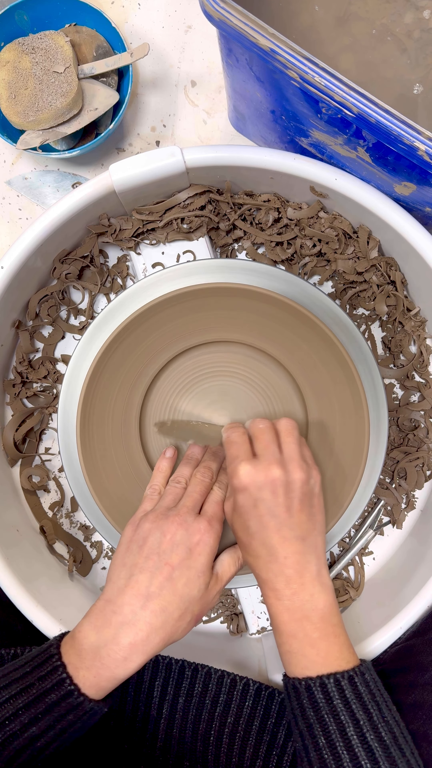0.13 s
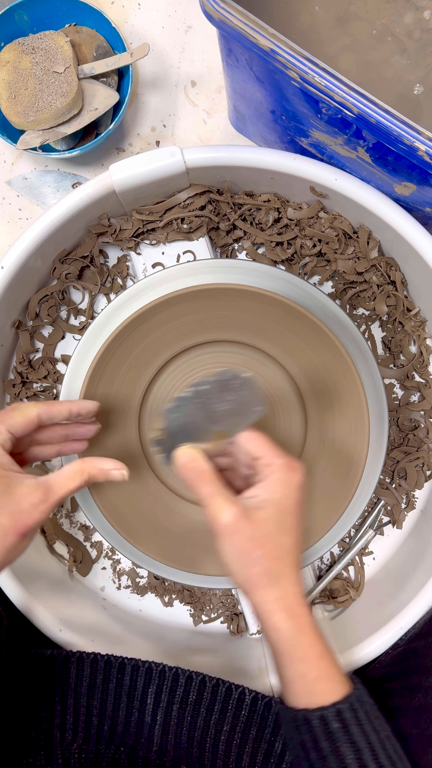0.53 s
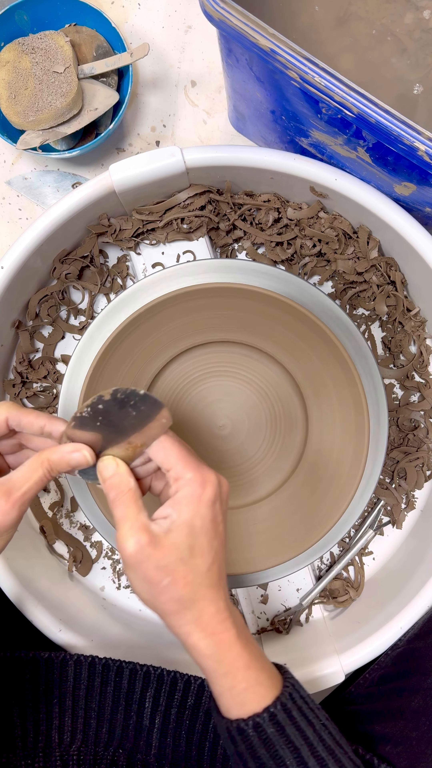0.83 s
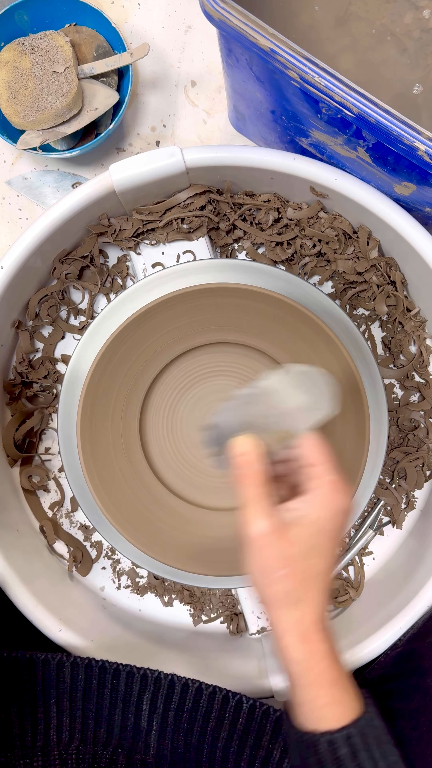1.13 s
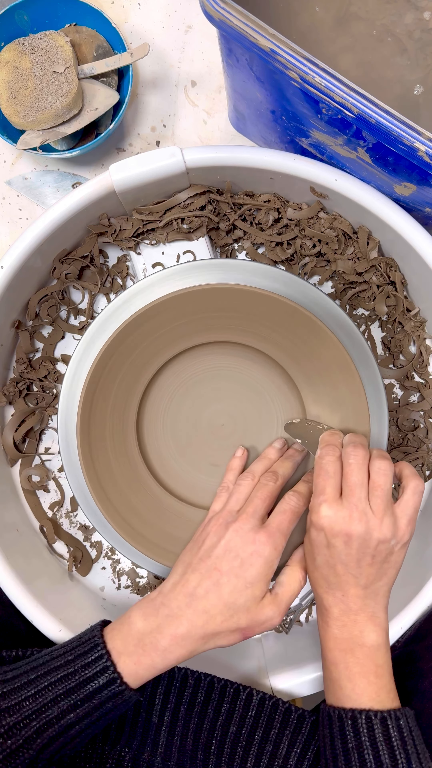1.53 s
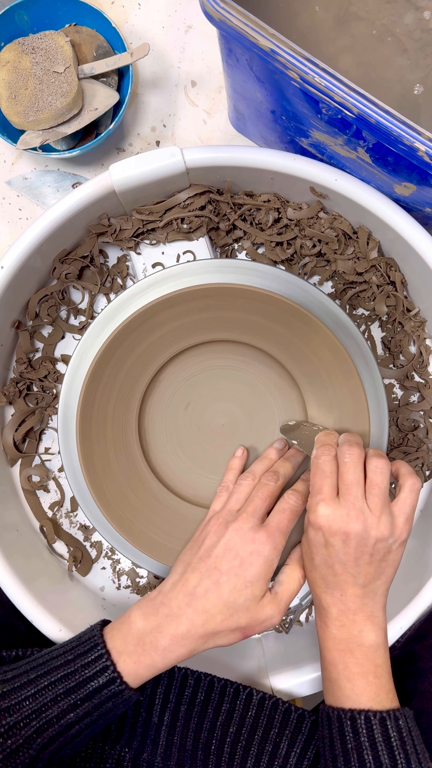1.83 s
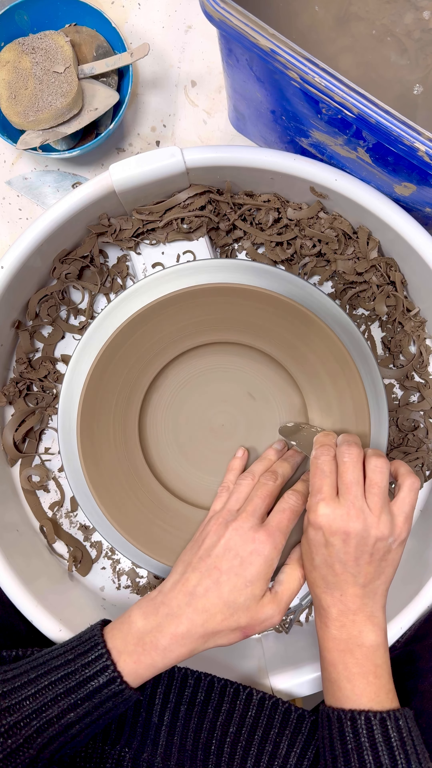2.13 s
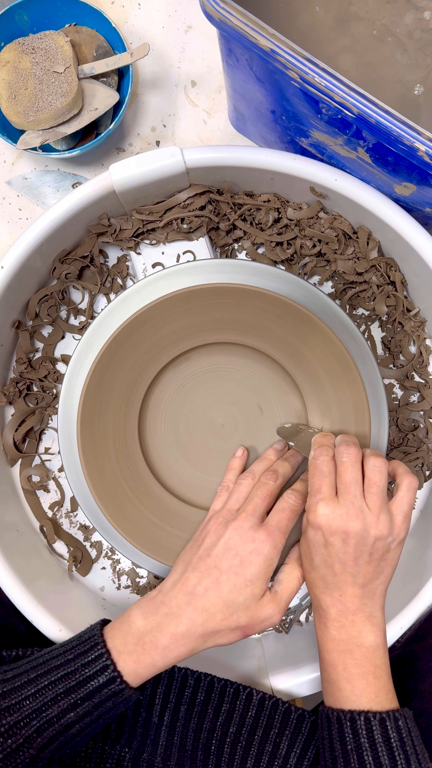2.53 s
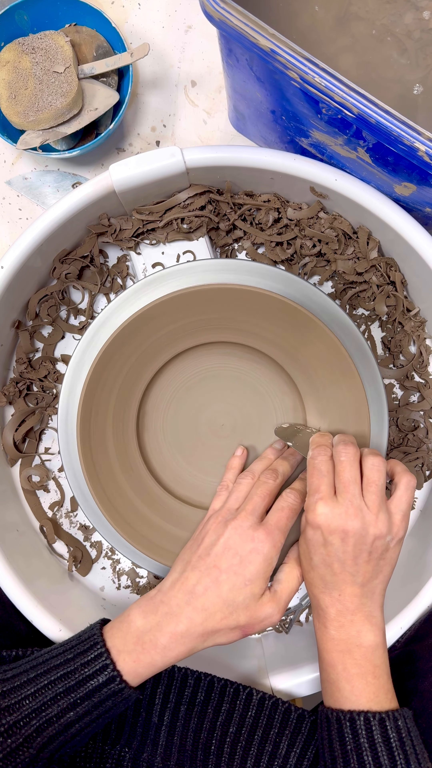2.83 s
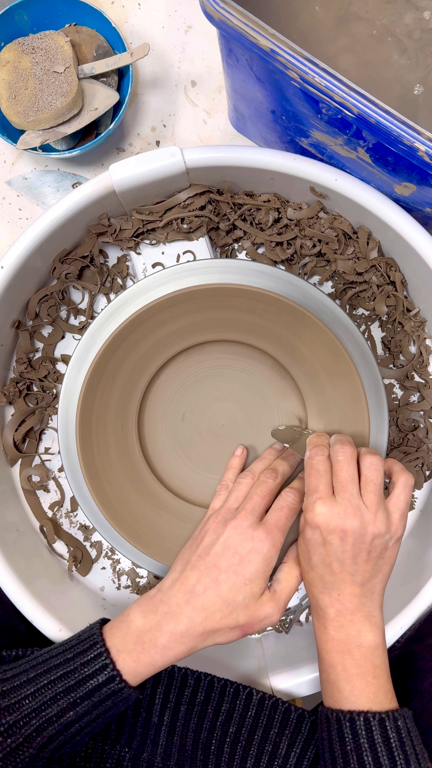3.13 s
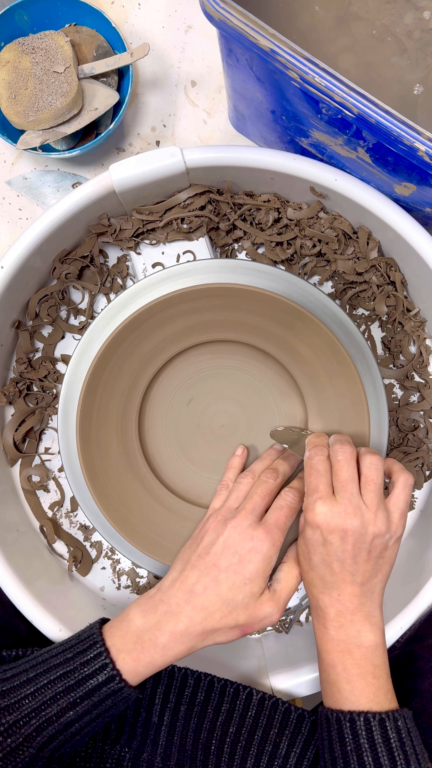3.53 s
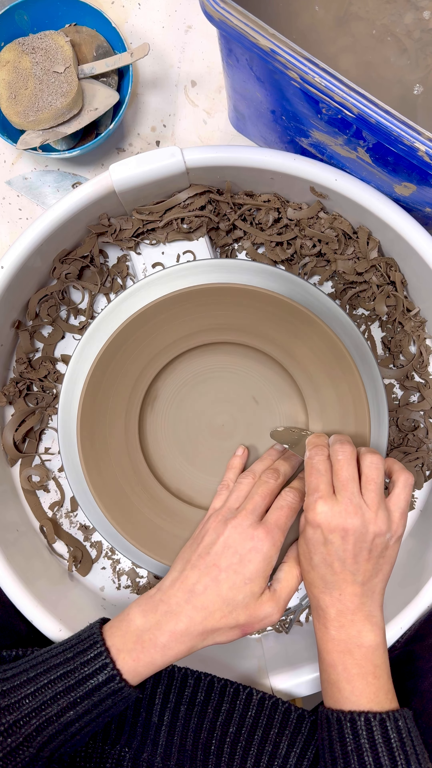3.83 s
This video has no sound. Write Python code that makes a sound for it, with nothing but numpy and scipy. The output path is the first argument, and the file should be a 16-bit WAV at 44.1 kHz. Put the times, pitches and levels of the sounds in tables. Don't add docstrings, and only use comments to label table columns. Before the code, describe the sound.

Gritty metal scraping on spinning clay, preceded by a free-running pottery wheel's singing motor, low airy puffs and one tiny metallic tick; an abrupt cut brings the rasping strokes over a lower hum. Close stereo microphone, indoor workshop.

```python
import sys
import numpy as np
from scipy import signal
from scipy.fft import rfft, irfft
from scipy.io import wavfile
from scipy.ndimage import uniform_filter1d

SR = 44100
rng = np.random.default_rng(int(sys.argv[2]) if len(sys.argv) > 2 else 0)


def nominal_scale(level):
    x = np.asarray(level, float) / 20
    return 10 ** x


def transcribe(u):
    v = np.clip(np.atleast_2d(u).T, -1, 1)
    q = np.round(v * 32767).astype(np.int16)
    wavfile.write(sys.argv[1], SR, q)


N = 175959

# [t/s, gear tone f/Hz, level/dB, octave level/dB]
FREE_MOTOR = [
    (0, 444, -28, -52),
    (.5, 443.5, -28.5, -53),
    (1.34, 445.2, -28, -46.5),
]
# [t/s, gear tone f/Hz, level/dB, octave level/dB]
LOADED_MOTOR = [
    (1.33, 368.8, -38.5, -53.5),
    (2.1, 366, -38, -58),
    (2.6, 367.3, -37.5, -56),
    (3.1, 365.8, -38.5, -58),
    (4, 362.7, -38, -61),
]
# [f/Hz, level/dB per Hz]
FREE_WASH = [(60, -5.5), (300, -10), (760, -5), (1300, -16.5), (3300, -29), (7600, -16), (10500, -13),
             (15500, -24)]
# [f/Hz, level/dB per Hz]
LOADED_WASH = [(25, -11.5), (80, -14.5), (150, -2), (330, -3), (490, -2), (1000, -10)]
# [f/Hz, width/Hz, level/dB]
WHINES = [(2235, 20, -3.5), (2540, 270, -10.5), (5076, 25, -2.5), (6500, 27, -19), (6310, 35, 1.5),
          (7200, 71, 2.5), (7650, 50, 1), (7960, 130, 2.5), (7660, 49, -5.5), (15400, 300, -9)]
# [t/s, level/dB]
STIR_LEVEL = [
    (0, -68),
    (.06, -51.5),
    (.1, -41.5),
    (.45, -42.5),
    (.72, -40),
    (.8, -50),
    (.95, -56.5),
    (1.2, -52.5),
    (1.33, -56),
]
# [f/Hz, level/dB]
STIR_COLOUR = [(25, -46), (50, -6), (100, -3.5), (240, -7.5), (370, -16.5), (600, -41)]
# [f/Hz, width/Hz, level/dB]
STIR_BOOMS = [(54.7, 5.4, -4.5), (87.3, 5.4, 9), (107, 6.3, -7), (151, 17, 5), (193.5, 6.7, -3),
              (227, 12, -3), (338, 54, -4)]
# [t/s, length/s, rib level/dB, dish level/dB, fizz level/dB]
HIGH_SPOTS = [(1.317, 0.068, 4.5, 5.5, 3), (1.462, 0.1, 4, 7.5, 5.5), (1.567, 0.22, 7.5, 9, 11.5),
              (1.88, 0.12, 3.5, 9, 5), (1.998, 0.18, 6, 7.5, 9), (2.179, 0.05, 6, 7, 1.5),
              (2.311, 0.15, 3, 8.5, 5), (2.456, 0.12, 3, 5.5, 2.5), (2.537, 0.065, 6, 2, 7.5),
              (2.736, 0.11, 2, 6.5, 6.5), (2.854, 0.088, 5.5, 11, 9.5), (2.959, 0.059, 9, 10, 3),
              (3.114, 0.1, 6.5, 9, 8), (3.228, 0.15, 7.5, 11, 8.5), (3.39, 0.088, 5.5, 3.5, 3),
              (3.534, 0.079, 2.5, 5, 5), (3.604, 0.11, 5.5, 10.5, 6.5), (3.714, 0.12, 6.5, 10, 6.5),
              (3.894, 0.085, 3.5, 5, 5)]
# [f/Hz, width/Hz, level/dB]
DISH_TONES = [(1132, 61, -12), (1214, 61, -5), (1418, 87, -4), (1480, 96, -0.5), (1810, 170, -13),
              (2038, 48, -4), (2142, 29, -6.5)]
# [f/Hz, width/Hz, level/dB]
RIB_TONES = [(2460, 210, -10), (2708, 82, 5), (2769, 96, 4), (2833, 46, 7.5), (2940, 100, 1.5),
             (3102, 54, 5), (3324, 63, 0.5), (3895, 260, -6)]
# [f/Hz, level/dB per Hz]
FIZZ_COLOUR = [(60, -61), (300, -14), (500, -12), (950, -15), (2300, -21), (4500, -13.5), (8300, -28),
               (15500, -15.5)]
# [f/Hz, width/Hz, level/dB]
FIZZ_TONES = [(5100, 260, -20.5), (5750, 133, -10), (6030, 67, -13.5), (6650, 293, -9.5),
              (7730, 470, -15.5), (10560, 1250, -12)]
# [t/s, peak level/dB]
RIB_CATCHES = [(1.4022, -29), (1.4285, -33), (1.4912, -31), (1.604, -28), (1.6282, -28), (1.6477, -26),
               (1.653, -23), (1.7057, -25), (1.7417, -38), (1.7834, -26), (1.835, -28), (1.9396, -27),
               (2.0107, -27), (2.0283, -29), (2.0288, -25), (2.0556, -17.5), (2.08, -33), (2.0932, -27.5),
               (2.117, -35), (2.1685, -30), (2.1969, -22.5), (2.2154, -32), (2.3416, -33), (2.4715, -29),
               (2.4822, -21), (2.5376, -34), (2.5445, -44), (2.5583, -35), (2.6195, -30), (2.7516, -28),
               (2.7796, -26.5), (2.9145, -31), (2.92, -20), (3.1256, -28), (3.3403, -29.5), (3.346, -29),
               (3.395, -27), (3.411, -23), (3.487, -38), (3.5987, -32.5), (3.7115, -31), (3.725, -34),
               (3.7401, -32), (3.7738, -20), (3.7751, -26), (3.8065, -33), (3.8407, -23), (3.9006, -28),
               (3.924, -28.5), (3.9707, -28)]
# [t/s, peak level/dB]
DISH_CATCHES = [(1.3668, -53), (1.6247, -30), (1.734, -51), (1.764, -43), (1.8978, -41), (1.9166, -32),
                (1.975, -42), (2.3295, -52), (2.3591, -35.5), (2.3876, -40), (2.448, -35), (2.488, -30.5),
                (2.5225, -30), (2.7302, -34.5), (2.752, -33), (2.7826, -36), (2.8065, -32.5), (2.8233, -28),
                (2.871, -34.5), (2.9103, -36.5), (2.965, -36), (3.2133, -40), (3.244, -38), (3.2644, -27),
                (3.319, -32), (3.3374, -25), (3.5982, -29.5), (3.6625, -36), (3.7675, -30), (3.924, -34)]
# [t/s, peak level/dB]
EDGE_CATCHES = [(1.4586, -30), (1.624, -29), (1.6946, -25.5), (1.902, -27), (2.004, -38), (2.157, -26),
                (2.5446, -37), (2.82, -30.5), (2.8649, -29), (2.89, -26.5), (2.9697, -30), (3.1243, -35),
                (3.1313, -29), (3.2963, -31), (3.347, -27), (3.5523, -38), (3.5803, -35), (3.5977, -27.5),
                (3.777, -39), (3.923, -29.5)]
# [t/s, peak level/dB]
SNAPS = [
    (1.345, -36),
    (1.706, -25.5),
    (2.4878, -14.5),
    (2.8914, -32),
    (2.9135, -28),
    (3.1714, -17),
    (3.3463, -32),
    (3.5977, -26),
    (3.8402, -32),
]
# [f/Hz, width/Hz, level/dB]
RIB_KNOCK = [(2950, 600, 0), (3900, 600, -8)]
# [f/Hz, width/Hz, level/dB]
DISH_KNOCK = [(1480, 200, 0), (1220, 150, -4), (2080, 300, -12)]
# [f/Hz, width/Hz, level/dB]
EDGE_KNOCK = [(5430, 440, 1.5), (6800, 410, 1), (4630, 600, -13)]
BUMP_TIMES = [1.68, 3.5, 1.91]
# [f/Hz, side minus mid level/dB]
PORT_GAP = [(100, -18), (460, -30.5), (650, -4.5), (1300, -12.5), (1900, -16), (2900, -8.5), (3950, -17.5),
            (5000, -3), (6500, -3.5), (9800, 5.5)]
SUDDEN_TIMES = [1.347, 2.488]

CUT_S, FADE_IN_S, FREE_LEFT_DB = 1.3365, 0.021, 1.8
WAVER_HZ, WAVER_DB = 0.89, .5
WHINE_DB, WASH_FREE_DB, WASH_LOADED_DB, AIR_DB = -52.5, -47.5, -52.5, -65
LAST_TOUCH_S, LAST_TOUCH_DB, TICK_S, TICK_DB = 0.13, -58.5, .956, -25.5
RIB_DB, DISH_DB, FIZZ_DB = -46, -54, -45.5
GRAINS_PER_S, GRAIN_SPREAD_DB, GRAIN_SHARE = 600, 5.5, 0.41
CHATTER_DB, SWAY_DB, TOP_SWAY_DB = 1.5, .6, 0.5
EDGE_S, RELEASE_S = .02, 0.038
SHEEN_S, SHEEN_DB, SHEEN_WIDTH_S = 2.84, 7, .08
GRIT_DB, RIB_T60, DISH_T60, EDGE_T60, SNAP_T60 = 0.5, 0.015, 0.028, 0.019, .008
RUB_DB, RUB_WIDTH_S = -51.5, 0.064
LOW_CUT_HZ, EDGE_HZ = 25, 15850
PORT_NULL_HZ, PORT_TOP_HZ, PORT_TOP_DB = 11960, 14160, 3.5
MASK_DB, MASK_FROM_HZ, MASK_JITTER_DB = -14, 1300, 3
QUIET_DB, WEAK_DB, LOOSE = -61.5, -8.5, .8


def evened(x):
    return x / np.sqrt(np.mean(x ** 2) + 1e-20)


def read(points, hz):
    f, value = np.transpose(points)
    return np.interp(np.log(hz + 1), np.log(f + 1), value)


def curve(table, col):
    return np.interp(np.arange(N) / SR, np.array(table)[:, 0], np.array(table)[:, col])


def hiss():
    return rng.standard_normal(N)


def coloured(x, points):
    return irfft(rfft(x) * nominal_scale(read(points, np.fft.rfftfreq(N, 1 / SR))), N)


def resonate(x, peaks):
    out = np.zeros(len(x))
    for k, (hz, width, db) in enumerate(peaks):
        ring = signal.lfilter(*signal.iirpeak(hz, hz / width, SR), x)
        out += (-1) ** k * nominal_scale(db) * ring
    return out


def slow(top_hz):
    t = np.arange(0, N + 64, 64) / SR
    f = np.geomspace(top_hz / 20, top_hz, num=30)[:, None]
    waves = np.sin(2 * np.pi * (f * t + rng.random((30, 1)))) / f ** 0.22
    return evened(np.interp(np.arange(N) / SR, t, waves.sum(0)))


def add(mix, s, sound):
    part = mix[round(s * SR):][:len(sound)]
    part += sound[:len(part)]


def hump(s, width_s):
    return np.exp(-((np.arange(N) / SR - s) / width_s) ** 2)


def motor(table):
    turn = 2 * np.pi * np.cumsum(curve(table, 1) + WAVER_HZ * slow(9.8)) / SR
    tone = nominal_scale(curve(table, 2) + WAVER_DB * slow(30)) * np.sin(turn)
    octave = nominal_scale(curve(table, 3) + 0.75 * slow(20)) * np.sin(2 * turn + 1.06)
    return np.sqrt(2) * (tone + octave)


def motor_whine():
    return nominal_scale(WHINE_DB) * evened(resonate(hiss(), WHINES))


def free_wash():
    return nominal_scale(WASH_FREE_DB + 1.3 * slow(60)) * evened(coloured(hiss(), FREE_WASH))


def stirred_air():
    air = coloured(hiss(), STIR_COLOUR)
    boom = resonate(air, STIR_BOOMS)
    return nominal_scale(curve(STIR_LEVEL, 1) + 0.98 * slow(25)) * evened(0.59 * air + boom)


def rasp():
    size_db = GRAIN_SPREAD_DB * np.minimum(rng.exponential(1, N), 4)
    grains = nominal_scale(size_db) * (rng.random(N) < GRAINS_PER_S / SR)
    grains *= rng.choice([-1., 1.], N)
    return GRAIN_SHARE * evened(grains) + hiss()


def last_touch():
    touching = np.arange(N) < LAST_TOUCH_S * SR
    return nominal_scale(LAST_TOUCH_DB) * touching * evened(resonate(rasp(), DISH_TONES + RIB_TONES[:3]))


def fingertip_tick():
    out, u = np.zeros(N), np.arange(600) / SR
    puff = nominal_scale(TICK_DB - 60 * u / 0.036) * np.minimum(u / 0.0022, 1) * rng.standard_normal(600)
    tones = [(2100, 500, -8), (2900, 500, -4), (3700, 300, -1),
             (4800, 250, 2), (5500, 250, 0), (6700, 400, -2)]
    add(out, TICK_S, resonate(puff, tones))
    return out


def free_wheel():
    return last_touch() + motor_whine() + free_wash() + stirred_air() + fingertip_tick()


def loaded_wash():
    wash = evened(coloured(hiss(), LOADED_WASH + [(2500, -70)]))
    wash = wash + resonate(hiss(), [(494.3, 14.0, 20), (695, 14, 21)])
    return nominal_scale(WASH_LOADED_DB + 2.4 * slow(26)) * wash


def loaded_air():
    return nominal_scale(AIR_DB) * evened(coloured(hiss(), FIZZ_COLOUR))


def pressure(col):
    t, out = np.arange(N) / SR, np.zeros(N)
    for row in HIGH_SPOTS:
        out += row[col] * ((t > row[0]) & (t <= row[0] + row[1]))
    keep = np.exp(-1 / (RELEASE_S * SR))
    out = np.maximum(out, signal.lfilter([1 - keep], [1, -keep], out))
    return uniform_filter1d(out, max(round(EDGE_S * SR), 1))


def ringing(force, chatter, level_db, col, tones):
    level = level_db + pressure(col) + chatter + SWAY_DB * slow(40)
    return nominal_scale(level) * evened(resonate(rasp() + force, tones))


def clay_fizz(force, chatter):
    shaved = coloured(force, FIZZ_COLOUR) + 1.75 * resonate(force, FIZZ_TONES)
    level = FIZZ_DB + pressure(col=4) + 0.61 * chatter + 0.094 * slow(40)
    fizz = nominal_scale(level) * evened(shaved)
    top = coloured(fizz, [(7000, -30), (9000, 0)])
    fizz = fizz + top * (nominal_scale(TOP_SWAY_DB * slow(15)) - 1)
    sheen = nominal_scale(SHEEN_DB * hump(SHEEN_S, SHEEN_WIDTH_S)) - 1
    return fizz + sheen * coloured(fizz, [(11500, -29), (13000, 3)])


def catches(table, t60, body):
    out, u = np.zeros(N), np.arange(1500) / SR
    fade = nominal_scale(-60 * u / t60) * np.minimum(u * 3000, 1)
    click = 2.3 * (abs(u - .0005) < 1e-4)
    for (s, db), noise in zip(table, rng.standard_normal((len(table), 1500))):
        ring = body(fade * (noise + click))
        add(out, s, nominal_scale(db + GRIT_DB) * ring / abs(ring).max())
    return out


def grit():
    snaps = catches(SNAPS, SNAP_T60, lambda x: np.diff(x, n=2, prepend=[0, 0]))
    rib = catches(RIB_CATCHES, RIB_T60, lambda x: resonate(x, RIB_KNOCK))
    dish = catches(DISH_CATCHES, DISH_T60, lambda x: resonate(x, DISH_KNOCK))
    edge = catches(EDGE_CATCHES, EDGE_T60, lambda x: resonate(x, EDGE_KNOCK))
    return snaps + rib + dish + edge


def scrape():
    chatter = CHATTER_DB * slow(330)
    force = rasp()
    rib = ringing(force, chatter, RIB_DB, 2, RIB_TONES)
    dish = ringing(force, chatter, DISH_DB, 3, DISH_TONES)
    fizz = clay_fizz(force, chatter)
    return coloured(rib + dish + fizz + grit(), [(40, -30), (300, 0)])


def bump_rub():
    bump = sum(hump(s, RUB_WIDTH_S) for s in BUMP_TIMES)
    return nominal_scale(RUB_DB) * bump * evened(resonate(hiss(), [(308, 37, 4), (480, 140, -3)]))


def loaded_wheel():
    return motor(LOADED_MOTOR) + loaded_wash() + loaded_air() + scrape() + bump_rub()


def scene():
    t = np.arange(N) / SR
    lean = nominal_scale([[FREE_LEFT_DB / 2], [-FREE_LEFT_DB / 2]])
    free = free_wheel() + motor(FREE_MOTOR) * lean
    fade_in = np.clip((t - CUT_S) / FADE_IN_S, 0, 1)
    return np.where(t < CUT_S, free, fade_in * loaded_wheel())


def masked(pair):
    hz, t, z = signal.stft(pair, SR, nperseg=2048, noverlap=1024)
    blur = LOOSE * (hz > 550)[:, None] * rng.standard_normal(z.shape[1:])
    z = z * np.exp(1j * blur * [[[0]], [[1]]])
    strength = abs(z) ** 2
    band = np.cumsum(1 / (6 + np.arange(1025) // 30)).astype(int)
    member = band[:, None] == np.arange(band[-1] + 1)
    power = np.einsum('cft,fb->cbt', strength, member / member.sum(0))
    hidden = power[::-1] * nominal_scale(2 * MASK_DB)
    quiet = strength.sum((0, 1)) * nominal_scale(2 * QUIET_DB)
    jitter = uniform_filter1d(rng.standard_normal(power.shape), size=2)
    floor = np.maximum(hidden, quiet) * nominal_scale(2 * MASK_JITTER_DB * jitter)
    heard = (power > floor)[:, band]
    strong = strength > power[:, band] * nominal_scale(2 * WEAK_DB)
    sudden = abs(t[:, None] - SUDDEN_TIMES).min(1) < .012
    keep = heard & strong | (hz < MASK_FROM_HZ)[:, None] | sudden
    return signal.istft(z * keep, nperseg=2048, noverlap=1024)[1][:, :N]


def roll_off(x):
    return signal.sosfilt(signal.butter(12, 16510, fs=SR, output="sos"), x)


def record(dry):
    hz = np.fft.rfftfreq(N, 1 / SR)
    passed = (hz < EDGE_HZ) * hz ** 2 / (hz ** 2 + LOW_CUT_HZ ** 2)
    centre = rfft(dry.mean(0)) * passed
    lean = rfft(dry[0] - dry[1]) * passed / 2
    gap = PORT_GAP + [(PORT_NULL_HZ, 30), (PORT_TOP_HZ, PORT_TOP_DB)]
    angle = np.arctan(nominal_scale(read(gap, hz)))
    mid = centre * np.cos(angle)
    side = centre * np.sin(angle) * 1j + lean * np.cos(angle)
    mid, side = masked(np.array([irfft(mid, N), irfft(side, N)]))
    return roll_off(np.array([mid + side, mid - side]))


dry = scene()
out = record(dry)
transcribe(out)
```